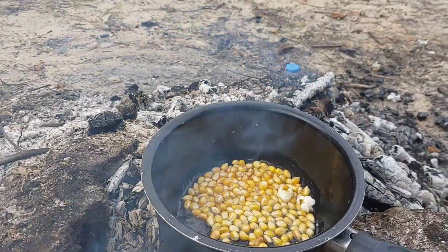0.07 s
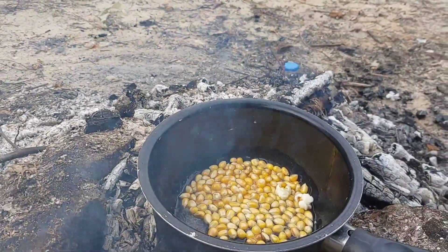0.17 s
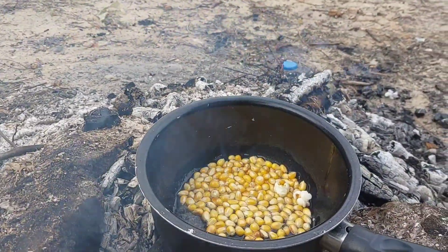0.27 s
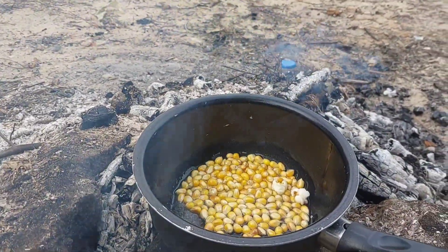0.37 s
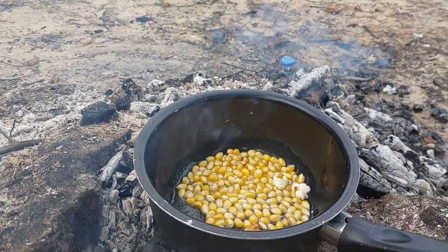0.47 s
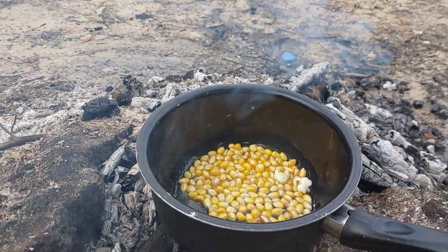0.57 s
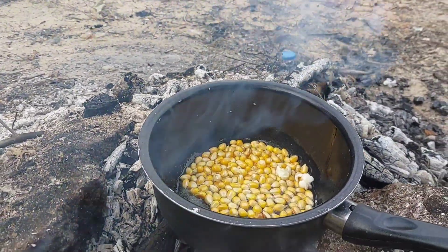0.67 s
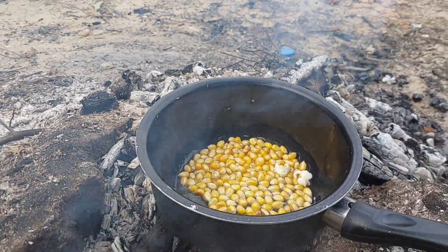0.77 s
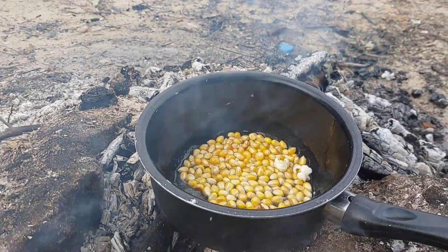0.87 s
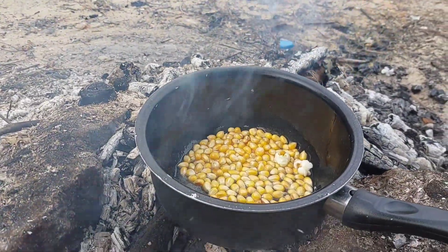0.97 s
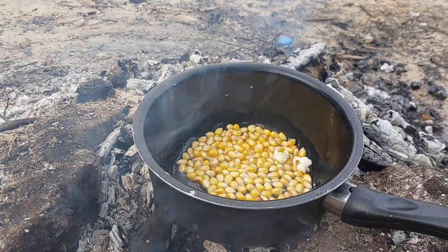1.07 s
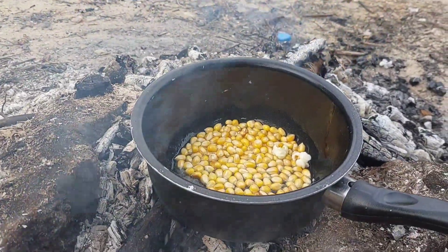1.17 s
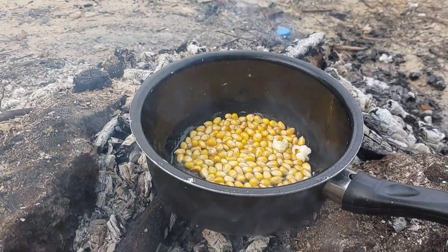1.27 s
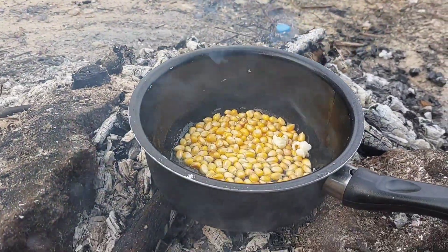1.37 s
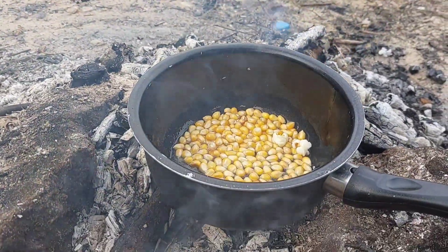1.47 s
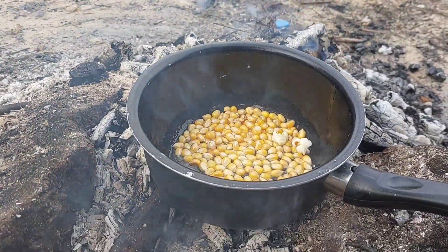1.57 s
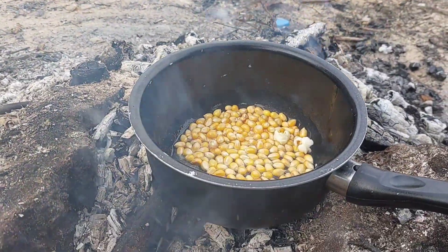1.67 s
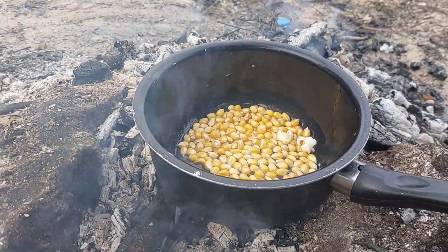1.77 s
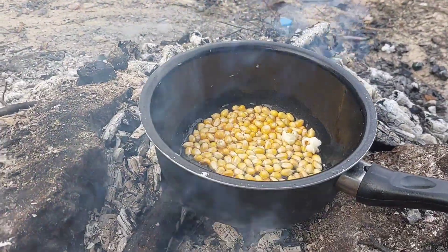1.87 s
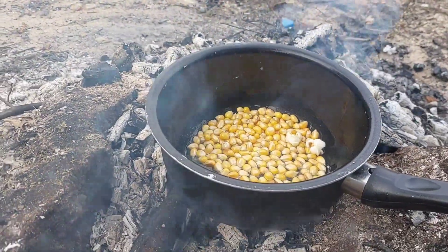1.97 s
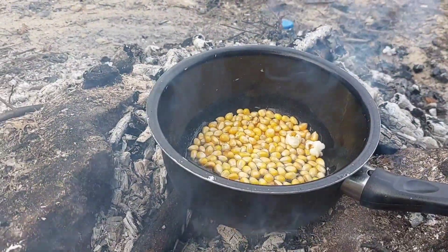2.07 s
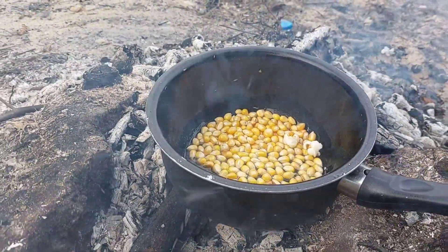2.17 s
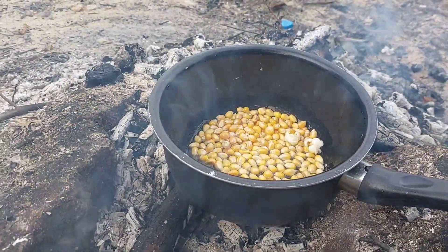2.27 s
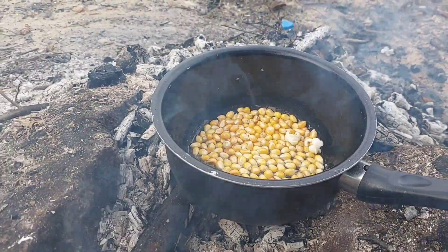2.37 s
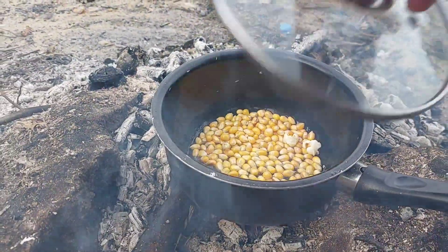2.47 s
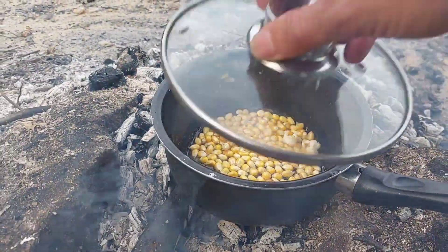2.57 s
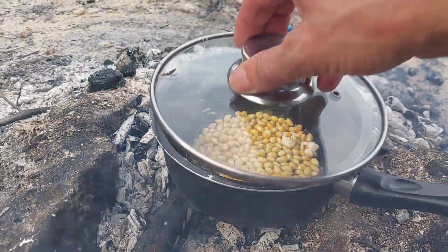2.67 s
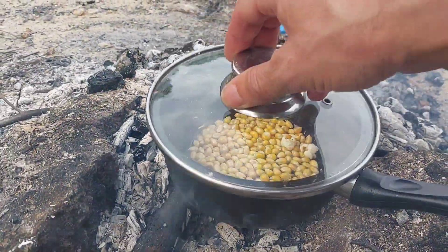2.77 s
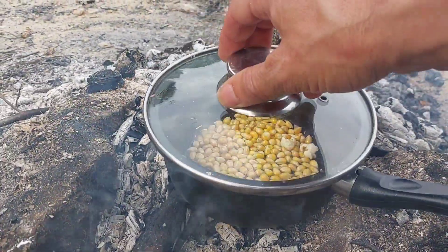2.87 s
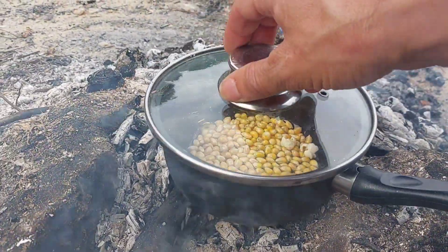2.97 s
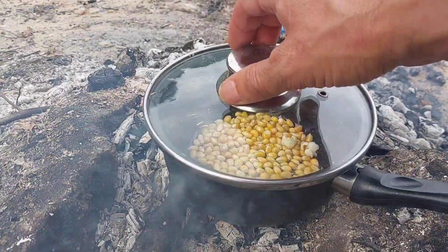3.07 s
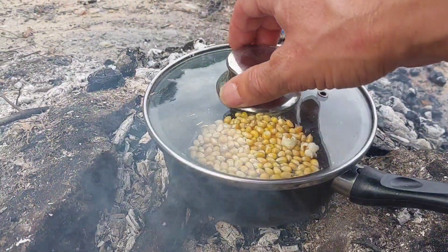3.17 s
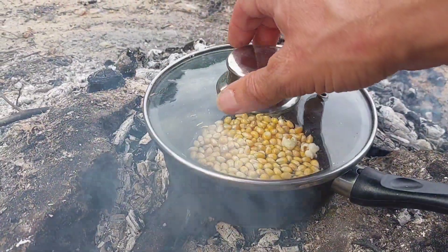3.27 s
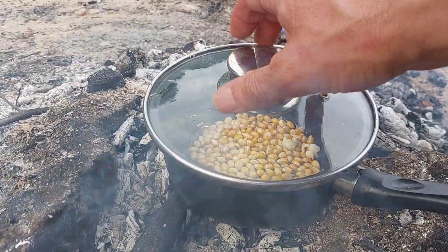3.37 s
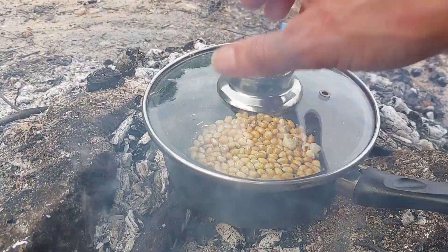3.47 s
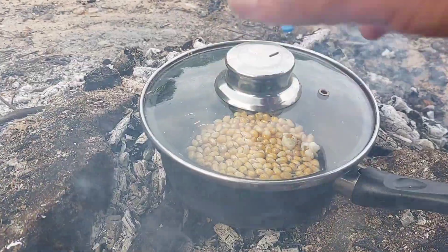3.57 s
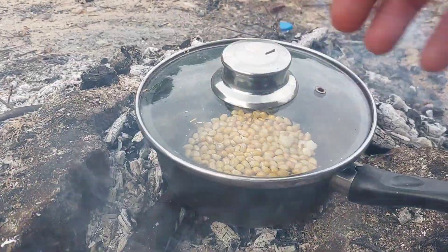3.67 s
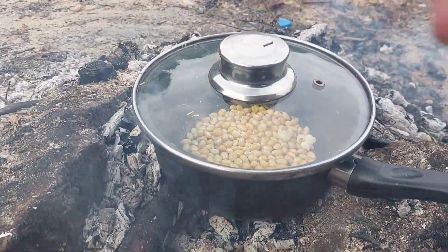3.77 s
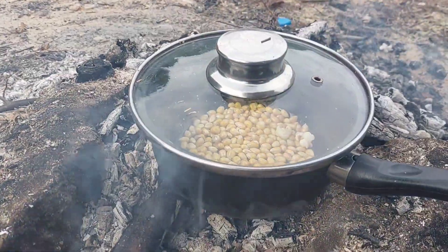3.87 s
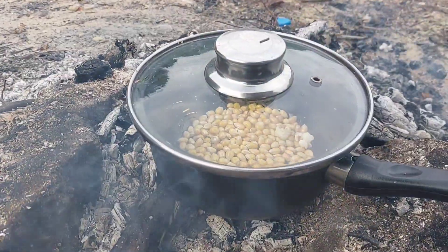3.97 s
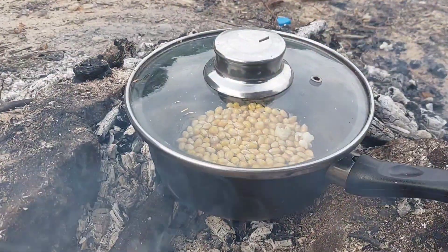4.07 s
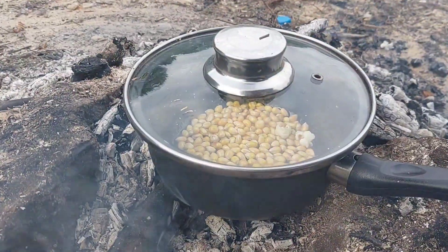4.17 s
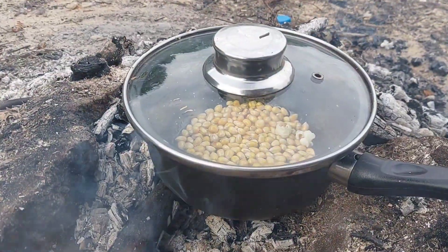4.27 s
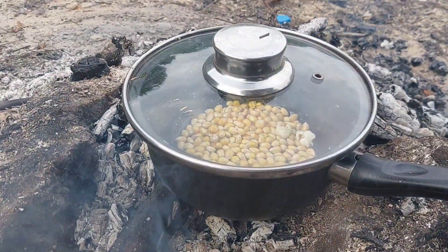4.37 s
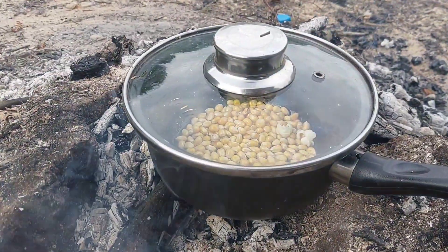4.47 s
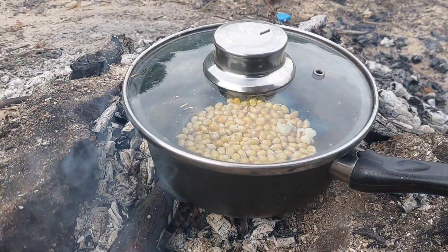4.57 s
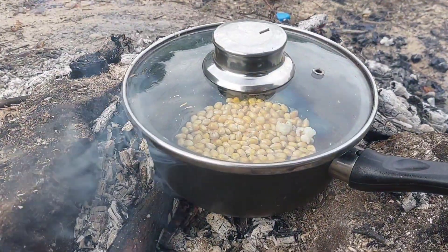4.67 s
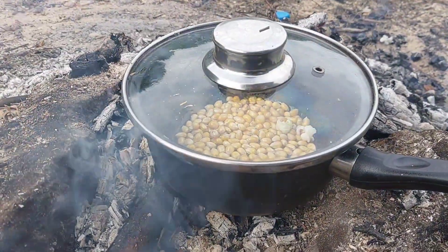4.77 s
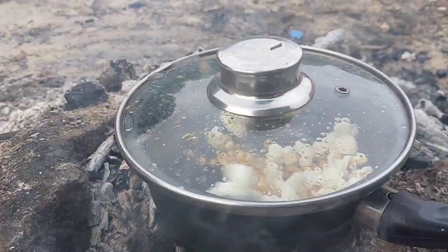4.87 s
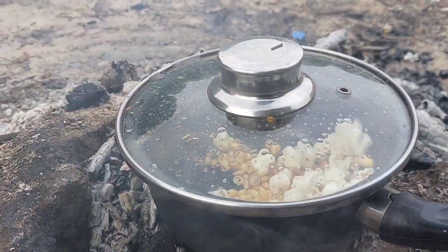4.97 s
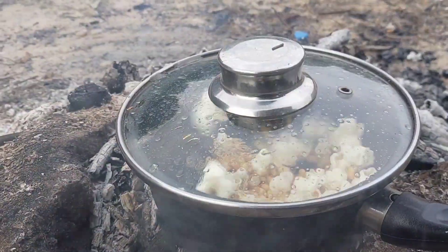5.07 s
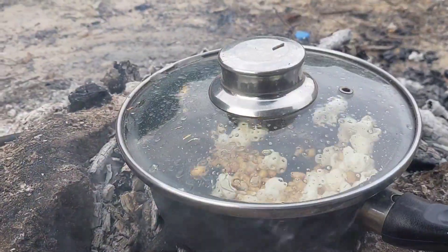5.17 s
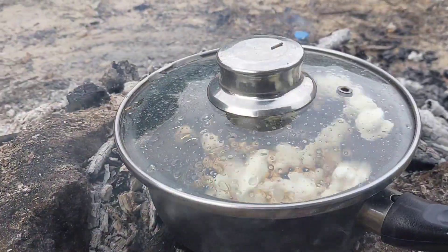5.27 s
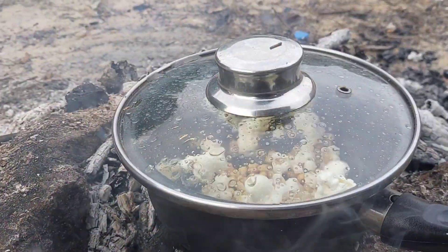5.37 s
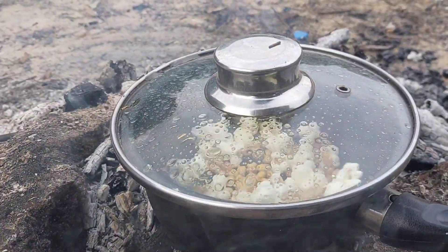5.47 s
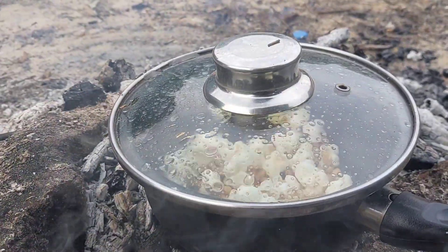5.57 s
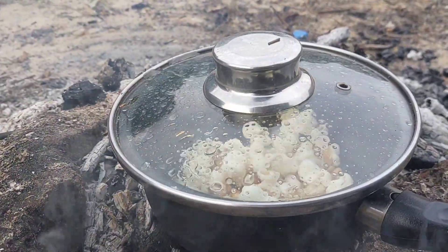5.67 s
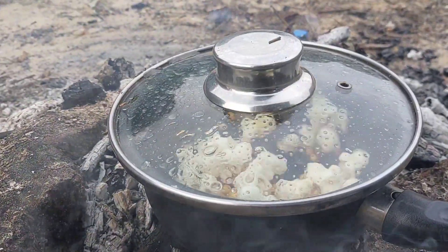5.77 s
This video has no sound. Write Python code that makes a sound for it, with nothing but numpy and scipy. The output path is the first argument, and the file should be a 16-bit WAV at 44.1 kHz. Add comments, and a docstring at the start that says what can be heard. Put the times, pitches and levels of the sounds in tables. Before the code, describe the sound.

Close stereo pickup of a pot outdoors over a soft low rumble. Oil fizzes finely with a few small spits, one sharp crack early on. At about three seconds a glass lid clatters on and the fizz almost vanishes. After a split second of complete silence, much louder corn pops burst inside the covered pot, ringing, thumping and hissing over a crackling wet sizzle until the end.

```python
"""Corn heats in a pot of oil on campfire embers, outdoors over a low rumble of filtered noise.
The oil fizzes (dense random noise bursts) and spits (cracks that ring the open pot's modes).
A glass lid clatters on (modes, scrape, sinking air knock) and shuts the fizz in; all sound stops briefly.
Then kernels burst: each pop rings the covered pot and the air under the lid, thumps and lets out steam
(noise), among small pops, ticks and spray and over a loud wet sizzle that each spill of water swells."""
import sys
import numpy as np
from scipy import signal
from scipy.fft import rfft, irfft
from scipy.io import wavfile
from scipy.ndimage import uniform_filter1d

SR = 44100
rng = np.random.default_rng(int(sys.argv[2]) if len(sys.argv) > 2 else 0)


def dump_mix(stems):
    """Bounce the given channels to the path in sys.argv[1] as a 16-bit WAV at rate SR."""
    frames = np.atleast_2d(stems).T  # one column per channel
    limited = np.clip(frames, -1, 1)  # hard clip at full scale
    pcm = np.round(limited * 32767).astype(np.int16)
    wavfile.write(sys.argv[1], SR, pcm)


N = 256220
TIME = np.arange(N) / SR  # s, whole scene
AGE = np.arange(SR // 6) / SR  # s, since the start of one short event

# silence between heating and popping: start/s, end/s
SILENCE_S = (4.869, 5.032)
# kernel bursts: t/s, metal level/dB, brightest f/Hz, thump level/dB, enclosed air level/dB, steam level/dB,
# steam time relative to the crack/s (negative: steam leaks first), level of wall ring under steam/dB,
# spilt water level/dB
POPS = [(5.1015, -32.5, 4430, -38, -42, -33.5, .006, -43, -51),
        (5.217, -29, 2000, -24, -43, -19.5, -0.0048, -28, -31.5),
        (5.250, -25.5, 2580, -23.5, -18, -37, 0.017, -47, -32.5),
        (5.442, -22.5, 3270, -28.5, -26.5, -19.5, .0112, -21, -35),
        (5.686, -24, 3620, -30, -49.5, -31, -0.0053, -49, -36),
        (5.7439, -19, 5800, -23, -49, -24, 0.0017, -49, -34)]
# modes of the covered pot: f/Hz, t60/s, level/dB
POT_MODES = [(1578, 0.053, -1.5), (1896, 0.085, 1), (1844, 0.047, 5), (2356, 0.043, -10), (2920, 0.1, -16),
             (3003, 0.073, 1), (3330, 0.11, -4.5), (3840, 0.03, 0.5), (4065, 0.055, 3.5), (4590, 0.04, 0),
             (5035, 0.02, 7.5), (5370, 0.037, 5.5), (5440, 0.028, 0), (6350, 0.027, 1), (6580, 0.021, 0.5),
             (7870, 0.032, -2), (7520, 0.018, 6)]
# spectrum of steam and spray: f/Hz, level/dB
STEAM_COLOUR = [(2000, -25), (5000, -10.5), (7000, -0.5), (9000, -7.5), (11500, 3), (16000, 2.5)]
# spectrum of a crack: f/Hz, level/dB
CRACK_COLOUR = [(300, -17), (1450, -11), (2100, -0.5), (5500, -3), (7500, -5), (9000, -9), (12000, -10.5)]


def pops():
    """A hull tears and rings the pot, the swelling starch thumps, and a jet of steam hits the wall."""
    tear_s, jet_s = 0.0032, 0.0039  # decay times
    jet_hz = 5500  # where the jet rings the wall most
    out = np.zeros((2, N))
    for s, metal_db, bright_hz, thump_db, air_db, steam_db, steam_offset_s, wall_db, _ in POPS:
        add(out, s, metal(metal_db, bright_hz, tear_s) + thump(thump_db, air_db))
        steam = undb(steam_db) * blow(colour(burst(jet_s), STEAM_COLOUR))
        add(out, s + steam_offset_s, steam + metal(wall_db, jet_hz, jet_s))
    return out


def metal(db, bright_hz, contact_s, ring_db=0, crack_db=-3, octave_db=4, ring_growth=0.33, full_db=-20,
          detune=0.01, spot_db=3):
    """A blow cracks against the covered pot and rings its modes; hard blows ring more than light ones."""
    # each spot on the wall wakes its own mix of modes, and the shifting corn detunes them
    spot = [(hz * (1 + detune * rng.standard_normal()), t60_s, gain_db + spot_db * rng.standard_normal())
            for hz, t60_s, gain_db in POT_MODES]
    wall = undb(ring_db + ring_growth * (db - full_db)) * ring(spot, contact_s)
    crack = blow(colour(burst(contact_s, tail_db=-19, tail_s=0.014), CRACK_COLOUR))
    struck = wall + undb(crack_db) * crack
    # loudest around bright_hz, falling off to both sides
    tilt = [(bright_hz / 4, -2 * octave_db), (bright_hz, 0), (bright_hz * 4, -2 * octave_db)]
    return undb(db) * blow(colour(struck, tilt))


def thump(db, air_db, push_s=0.0014, rattle_db=-24):
    """One low push: the enclosed air honks, the neighbouring kernels are jostled and tumble back."""
    # spectrum of the push: f/Hz, level/dB
    thump_colour = [(30, -34), (90, 4.5), (200, 1.5), (350, 1), (500, 1.5), (700, -2), (2000, -61)]
    # broad honk of the air shut in between oil and lid: f/Hz, level/dB
    air_colour = [(250, -39), (500, 1), (660, -21.5), (800, 6.5), (1000, 2), (1200, 6.5), (1420, -12),
                  (2500, -41)]
    push = (AGE / push_s - 1) * np.exp(-AGE / push_s)
    tumble = undb(rattle_db) * np.exp(-AGE / 0.074) * rng.standard_normal(len(AGE))
    # an impulse with a weak noise tail
    puff = (AGE == 0) + 0.015 * np.exp(-AGE / 0.012) * rng.standard_normal(len(AGE))
    low = undb(db) * blow(colour(push + tumble, thump_colour))
    air = undb(air_db) * blow(colour(puff, air_colour))
    return low + air


def small_pops(air_db=-5.5, spray_db=-7, faint_db=-43, faint_thud_db=-51, faint_hz=4500, spread_db=3, count=24):
    """Small pops and ticks, bits of spray, the end of a pop: metal ring, dull thud, spray; faint random ones."""
    # small pops and ticks, bits of spray, the end of a pop: t/s, metal level/dB, brightest f/Hz, thud level/dB
    small_events = [(4.82, -61.5, 1600, -52.5), (5.033, -44.5, 5210, -49.5), (5.045, -32.5, 3180, -46),
                    (5.080, -28.5, 2750, -39.5), (5.168, -58, 1800, -40), (5.235, -26, 4500, -34),
                    (5.281, -41, 4000, -37.5), (5.348, -32, 2740, -43), (5.464, -35, 5000, -36),
                    (5.489, -33, 4000, -41.5), (5.501, -36, 5500, -46), (5.507, -36, 7000, -44),
                    (5.514, -39.5, 2590, -42), (5.597, -45, 1900, -43.5), (5.632, -56, 2500, -41.5),
                    (5.647, -42.5, 9000, -64), (5.726, -41, 2200, -44), (5.779, -50, 3000, -38)]
    contact_s = 0.00063
    faint = []
    for _ in range(count):
        s = rng.uniform(SILENCE_S[1], TIME[-1])
        db = faint_db + spread_db * rng.standard_normal()
        bright_hz = faint_hz * 2 ** rng.uniform(-0.66, 1)
        thud_db = faint_thud_db + spread_db * rng.standard_normal()
        faint.append((s, db, bright_hz, thud_db))
    out = np.zeros((2, N))
    for s, db, bright_hz, thud_db in small_events + faint:
        spray = undb(db + spray_db) * blow(colour(burst(contact_s), STEAM_COLOUR))
        add(out, s, metal(db, bright_hz, contact_s) + thump(thud_db, thud_db + air_db) + spray)
    return out


def sizzle(level_db=-2.0, ring_db=-13, tick_db=-11.5):
    """Water from the burst kernels crackles in the oil and keeps the covered pot ringing."""
    # spectrum of the crackle: f/Hz, level/dB
    sizzle_colour = [(24, -41.5), (40, -7), (130, -10), (290, -11), (516, -5), (646, -16), (810, -7),
                     (1020, -21), (1210, -18.5), (1410, -20.5), (1850, -21.5), (3560, -22.5), (5310, -18.5),
                     (8550, -19.5), (16000, -12)]
    boil = bubbles(2700, 1.9)
    # long waves reach both ears alike
    bass = signal.sosfiltfilt(signal.butter(2, 900, fs=SR, output="sos"), boil)
    crackle = unit(colour(boil - bass + bass[0], sizzle_colour))
    # droplets and bits of hull tick against the wall: light blows that favour its high modes
    ticks = colour(bubbles(120, 2.6), CRACK_COLOUR)
    ringing = signal.fftconvolve(ticks, ring(POT_MODES, 0.00073), axes=1)[:, :N]
    ringing = unit(colour(ringing, [(1900, -8.5), (4000, -4)]))
    mix = crackle + undb(ring_db) * ringing + undb(tick_db) * unit(ticks)
    return mix * wetness() * undb(level_db + 0.61 * walk(38))


def wetness():
    """Relative sizzle gain: the power of every spill adds to the steady boil, then boils off."""
    steady_db, rise_s, boil_off_s = -41, 0.016, 0.045
    power = undb(steady_db) ** 2
    for s, *_, spill_db in POPS:
        age = np.maximum(TIME - s, 0)
        power = power + undb(spill_db) ** 2 * (1 - np.exp(-age / rise_s)) * np.exp(-age / boil_off_s)
    return np.sqrt(power)


def lean(x, share):
    """The covered pot radiates unevenly to the two ears."""
    # left in the middle, right in the treble: f/Hz, left minus right level/dB
    balance = [(200, 0), (700, 3), (1300, 6), (2200, 5), (3300, 4.5), (4200, -4.5), (5400, -8), (7000, -4),
               (9500, 0.5), (16000, 4)]
    left = colour(x[0], [(hz, share * db / 2) for hz, db in balance])
    right = colour(x[1], [(hz, -share * db / 2) for hz, db in balance])
    return np.vstack([left, right])


def lid(ring_db=-1, crack_db=-8, scrape_db=-7, tail_db=-23, tail_s=0.033, clack_hz=975, clack_t60_s=0.012,
        left_db=1.4, count=3):
    """Lid contacts and the soft air pushes around its seating; each repeats ever more weakly, with a faint tail."""
    # lid contacts and the soft air pushes around its seating: t/s, rim ring level/dB, hollow knock level/dB,
    # knock f/Hz, f it sinks to/Hz, glass clack level/dB, change per repeat/dB
    lid_events = [(2.9315, -25.5, -19.5, 594, 570, -37, -23), (2.9422, -29, -24, 600, 567, -39.5, -3.5),
                  (2.9957, -41, -30, 492, 463, -42, -20.5), (2.9997, -20.5, -29.5, 522, 420, -20, -20.5),
                  (3.0071, -37, -24, 388, 213, -39.5, -18.5), (3.0287, -31, -26.5, 545, 158.2, -38, -9)]
    # modes of the lid on the rim: f/Hz, t60/s, level/dB
    lid_modes = [(1197, 0.041, -9.5), (1555, 0.031, -5.5), (1876, 0.062, -8), (2077, .03, 2),
                 (2190, 0.027, 4.5), (2950, 0.02, -11), (3410, .035, -8.5), (3980, .035, -11.5),
                 (5370, 0.027, -7.5), (6200, .03, -10), (6640, 0.024, -7.5), (7600, 0.018, -3.5)]
    # spectrum of the skid: f/Hz, level/dB
    scrape_colour = [(2000, -27.5), (5000, -13), (7300, 0.5), (8900, -11.5), (10500, 6), (12200, 2.5),
                     (16000, -8.5)]
    repeat_s, contact_s = 0.0048, 0.0019  # spacing of the repeats; contact time
    out = np.zeros((2, N))
    for s, db, hollow_db, hz, end_hz, clack_db, repeat_db in lid_events:
        for k in range(count):
            crack = undb(crack_db) * blow(colour(burst(contact_s), CRACK_COLOUR))
            rim = undb(ring_db) * ring(lid_modes, contact_s) + crack
            scrape = undb(scrape_db) * blow(colour(burst(contact_s), scrape_colour))
            glass = undb(clack_db) * ring([(clack_hz, clack_t60_s, 0)], contact_s)
            air = undb(hollow_db) * knock(hz + (end_hz - hz) * k / count, end_hz)
            add(out, s + k * repeat_s, undb(k * repeat_db) * (undb(db) * (rim + scrape) + glass + air))
        tail = np.exp(-AGE / tail_s) * rng.standard_normal((2, len(AGE)))
        add(out, s, undb(db + tail_db) * blow(colour(tail, CRACK_COLOUR)))
    return out * undb([[left_db], [-left_db]])


def knock(hz, end_hz, t60_s=0.031, sink_s=0.007, rise_s=0.00023):
    """The air in the pot rings through the gap under the lid, and sinks in pitch as the gap closes."""
    pitch_hz = end_hz + (hz - end_hz) * np.exp(-AGE / sink_s)
    cycles = np.cumsum(pitch_hz) / SR
    # same loss in every cycle; t60_s holds at the starting pitch
    swing = (1 - np.exp(-AGE / rise_s)) * np.exp(-np.log(1000) * cycles / (hz * t60_s))
    return blow(-np.sin(2 * np.pi * cycles) * swing)


def spits(ring_db=-3.0, crack_db=-4.0, count=8):
    """Larger droplets crack, spray and ring the open pot; faint random ones grow rare as the oil dries."""
    # louder spits: t/s, crack level/dB, spray level/dB
    loud = [(.003, -42.5, -58), (0.03, -47.5, -57), (.058, -41, -54), (0.416, -42, -35), (0.4365, -26, -32),
            (.542, -49, -35), (.747, -57, -38), (.914, -56, -43), (1.248, -50.5, -49)]
    # modes of the open pot: f/Hz, t60/s, level/dB
    open_modes = [(747, 0.067, -10.5), (1890, 0.14, -15.5), (2090, 0.03, 4), (2560, 0.028, 0),
                  (3340, 0.051, 7.5), (3970, 0.024, -1), (4300, 0.01, 13.5), (5280, 0.058, 4.5),
                  (7520, 0.033, -3.5)]
    crack_s, spray_s = 0.00097, 0.0019  # decay times
    faint_db, faint_spray_db, spread_db, drying_s = -56, -44, 1, 0.3
    faint = []
    for _ in range(count):
        s = min(drying_s * rng.exponential(), SILENCE_S[0])
        db = faint_db + spread_db * rng.standard_normal()
        faint.append((s, db, faint_spray_db + spread_db * rng.standard_normal()))
    out = np.zeros((2, N))
    for s, db, spray_db in loud + faint:
        crack = undb(crack_db) * blow(colour(burst(crack_s), CRACK_COLOUR))
        add(out, s, undb(db) * (crack + undb(ring_db) * ring(open_modes, crack_s)))
        add(out, s, undb(spray_db) * blow(colour(burst(spray_s), STEAM_COLOUR)))
    return out


def fizz(flicker_db=0.8, left_db=1):
    """Oil fizz, dense tiny bursts, with brief hiss swells: spray, a whoosh, a puff of steam."""
    # fizz fading, shut in by the lid, then building under it: t/s, level/dB
    fizz_level = [(0, -50), (.3, -51.5), (2.7, -56), (3.35, -74.5), (4.86, -69)]
    # brief hiss swells: t/s, bright fizz level/dB, soft hiss level/dB, half width (to 1/e)/s
    swells = [(0.432, -43, -58, 0.013), (0.781, -62, -60, 0.039), (1.38, -62.5, -90, 0.066),
              (2.28, -59, -64.5, 0.11), (4.446, -62, -69.5, 0.029), (4.835, -69, -71, .018)]
    # spectrum of the bright fizz: f/Hz, level/dB
    fizz_colour = [(590, -44.5), (1000, -13), (1550, -18.5), (2100, -9.5), (2810, -9.5), (3840, -4.5),
                   (6400, -4), (7700, -1), (9280, -5.5), (11800, 2.5), (16000, -3.5)]
    # spectrum of the soft hiss: f/Hz, level/dB
    swell_colour = [(400, 11), (800, 27.5), (1300, 12.5), (3500, 22.5), (7000, -18), (16000, -27.5)]
    bright_gain = curve(fizz_level) + sum(hump(s, db, width_s) for s, db, _, width_s in swells)
    bright = unit(colour(bubbles(3700, 2.0), fizz_colour)) * bright_gain * undb(flicker_db * walk(25))
    hiss_gain = sum(hump(s, db, width_s) for s, _, db, width_s in swells)
    hiss = hiss_gain * unit(colour(bubbles(1700, 1.6), swell_colour))
    return bright * undb([[left_db], [-left_db]]) + hiss


def rumble(side_db=-7, wander_db=1.0):
    """Low outdoor noise, nearly the same in both ears, wandering slightly, with a few gusts."""
    # spectrum: f/Hz, level/dB
    rumble_colour = [(20, -44), (32, -23), (45, -4), (60, 0), (140, -2.5), (200, -8.5), (265, -12),
                     (350, -26), (520, -27.5), (950, -33.5), (1200, -46), (4500, -57), (9000, -77)]
    # gusts: t/s, level/dB, half width (to 1/e)/s
    gusts = [(2.28, -48.5, 0.089), (4.3, -60.5, .08)]
    steady_db = -49.5
    mid, side = rng.standard_normal((2, N))
    side_colour = [(30, 1.0), (120, -11.0), (200, -4), (400, 1.5), (1400, 3.5)]
    side = colour(side, side_colour)[0] * undb(side_db)
    ears = unit(colour(np.array([mid + side, mid - side]), rumble_colour))
    gain = undb(steady_db) + sum(hump(*gust) for gust in gusts)
    return ears * gain * undb(wander_db * walk(14))


def bubbles(rate_hz, spread_db):
    """Countless tiny bursts: mostly faint, a few strong, each heard differently by the two ears."""
    bursts = rng.random(N) < rate_hz / SR
    sizes = undb(spread_db * np.minimum(rng.exponential(size=N), 6))
    # powers add and decay with a 1.8 ms time constant
    power = signal.lfilter([1], [1, -np.exp(-1 / (0.0018 * SR))], bursts * sizes ** 2)
    return unit(np.sqrt(power) * rng.standard_normal((2, N)))


def burst(decay_s, tail_db=-22, tail_s=0.0086):
    """A sudden rush of noise, followed by its weak reflections in the pot."""
    decay_s = max(decay_s, .0003)
    rise = 1 - np.exp(-2 * AGE / decay_s)
    fall = np.exp(-AGE / decay_s) + undb(tail_db) * np.exp(-AGE / tail_s)
    return rise * fall * rng.standard_normal((2, len(AGE)))


def ring(modes, contact_s, scatter_db=2.5, apart_hz=2500):
    """Struck modes build up over the contact; the higher ones reach each ear in a different phase."""
    hz, t60_s, db = np.transpose(modes)[:, :, None, None]
    apart = np.minimum(hz / apart_hz, 2) ** 2
    phase = rng.standard_normal((len(modes), 2, 1)) * apart
    gain = undb(db + scatter_db * np.minimum(apart, 1) * rng.standard_normal((len(modes), 2, 1)))
    detune = 1 + .003 * rng.standard_normal((len(modes), 1, 1))
    decay = np.exp(-np.log(1000) * AGE / t60_s)
    waves = gain * decay * np.sin(2 * np.pi * hz * detune * AGE + phase)
    return blow(waves.sum(0) * (1 - np.exp(-2 * AGE / max(contact_s, .0003))))


def colour(x, points, size=4096):
    """Causal minimum-phase filter through (f/Hz, level/dB) points, by folding the cepstrum."""
    hz, db = np.transpose(points)
    grid_hz = np.fft.rfftfreq(size, 1 / SR) + 1
    log_gain = np.log(undb(np.interp(np.log(grid_hz), np.log(hz), db)))
    cepstrum = irfft(log_gain)[:size // 2] * np.r_[1, np.full(size // 2 - 1, 2)]
    response = irfft(np.exp(rfft(cepstrum, size)))
    return signal.fftconvolve(np.atleast_2d(x), response[None], axes=1)[:, :x.shape[-1]]


def undb(db):
    """Decibels to gain."""
    return 10 ** (np.asarray(db) / 20)


def curve(rows):
    """Gain over time from rows of (t/s, level/dB)."""
    return undb(np.interp(TIME, *np.transpose(rows)))


def hump(s, db, width_s):
    """Gain over time of a smooth rise and fall."""
    return undb(db) * np.exp(-((TIME - s) / width_s) ** 2)


def walk(rate_hz):
    """Slow random wander with a spread near 1."""
    k = int(SR / rate_hz)
    steps = np.repeat(rng.standard_normal(N // k + 1), k)
    return np.sqrt(2) * uniform_filter1d(steps, k)[:N]


def unit(x):
    """Scale to rms 1."""
    return x / np.sqrt(np.mean(x ** 2))


def blow(x):
    """Scale a short sound to the energy of 5 ms at rms 1."""
    return unit(x) * np.sqrt(.005 * SR / x.shape[-1])


def add(out, s, x):
    """Mix x in at time s."""
    start = max(int(s * SR), 0)
    out[:, start:start + x.shape[-1]] += x[:, :N - start]


def scene():
    """The heating pot, a moment of silence, then the popping."""
    before, after = TIME < SILENCE_S[0], TIME > SILENCE_S[1]
    heating = (fizz() + spits() + lid()) * before
    popping = lean(pops() + small_pops(), share=1.03) + lean(sizzle(), share=0.78) * after
    gate = uniform_filter1d(1. * (before | after), size=64)  # mutes the rumble too
    return (heating + popping + rumble()) * gate


def record(dry):
    """The recorder cuts the top: a steep elliptic low-pass."""
    top_hz = 16000
    return signal.sosfilt(signal.ellip(8, .2, 70, top_hz, fs=SR, output="sos"), dry)


dry = scene()
out = record(dry)
dump_mix(out)
```